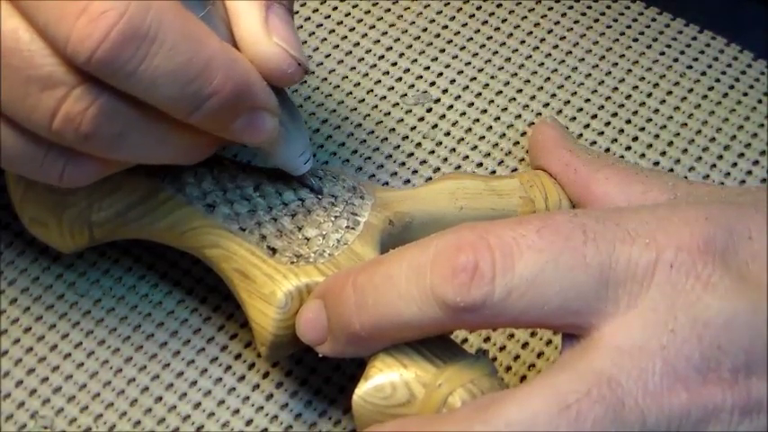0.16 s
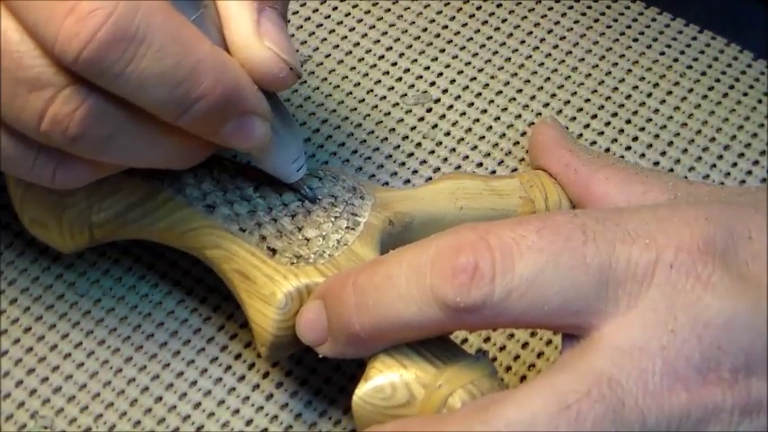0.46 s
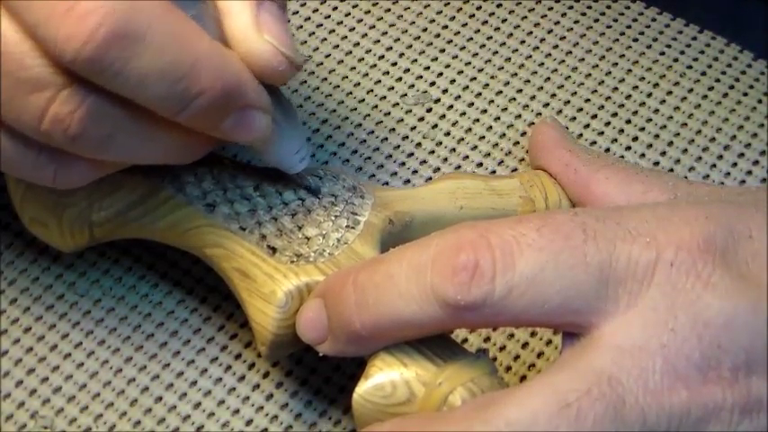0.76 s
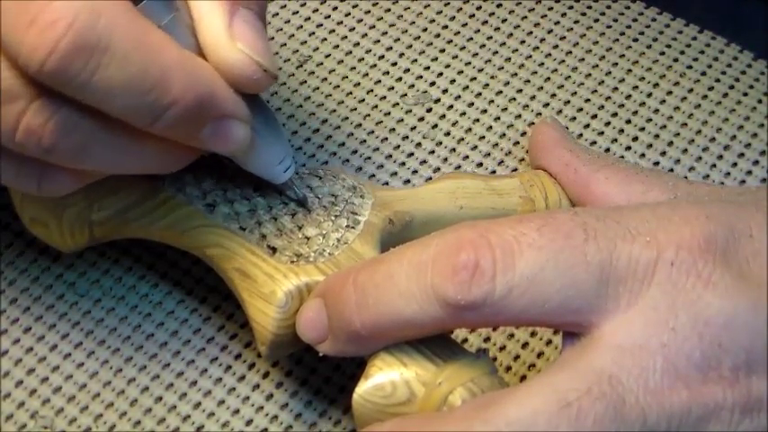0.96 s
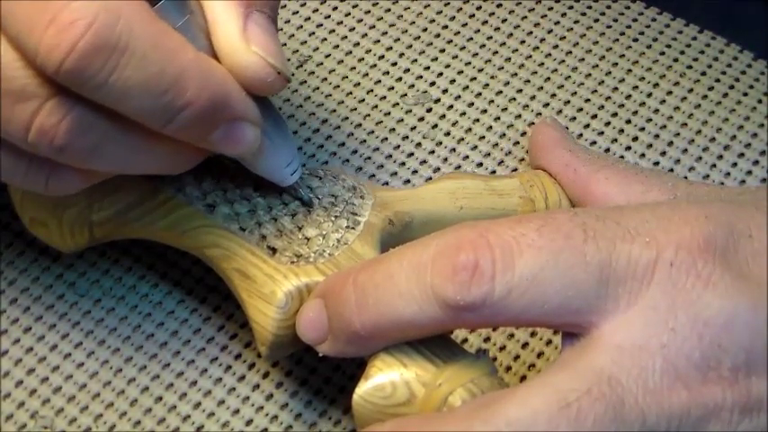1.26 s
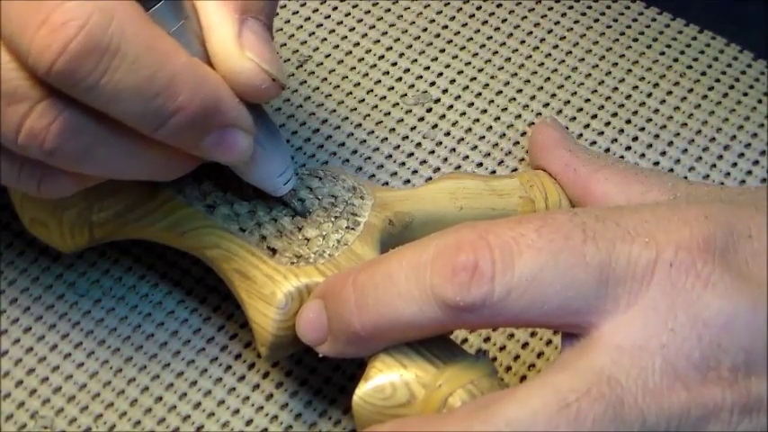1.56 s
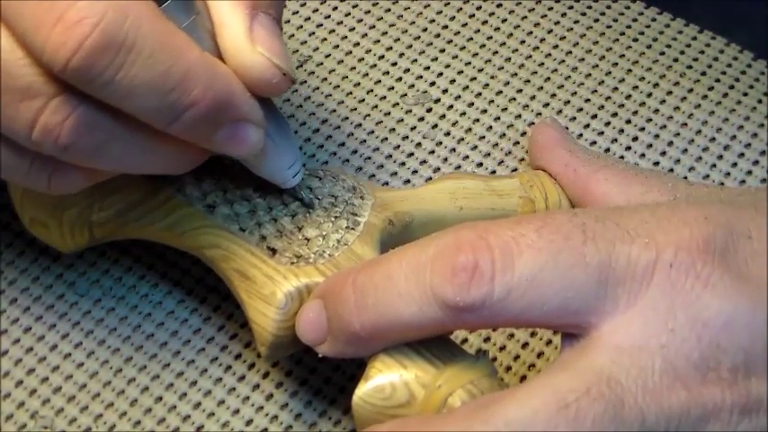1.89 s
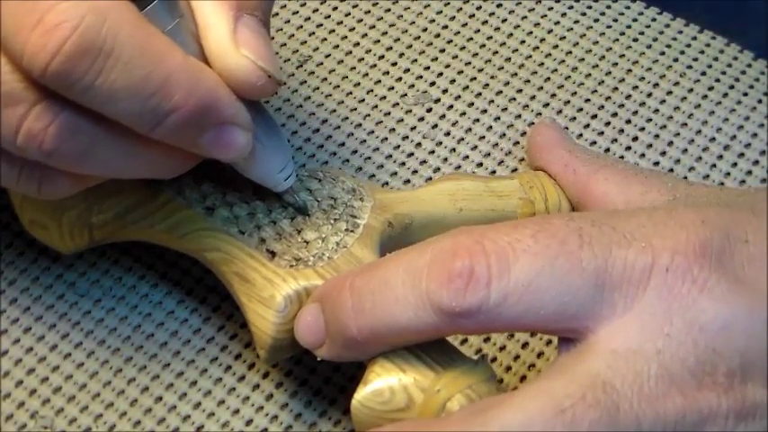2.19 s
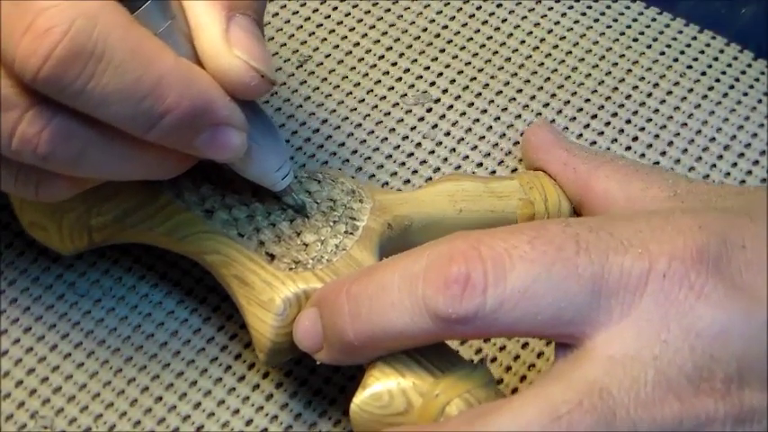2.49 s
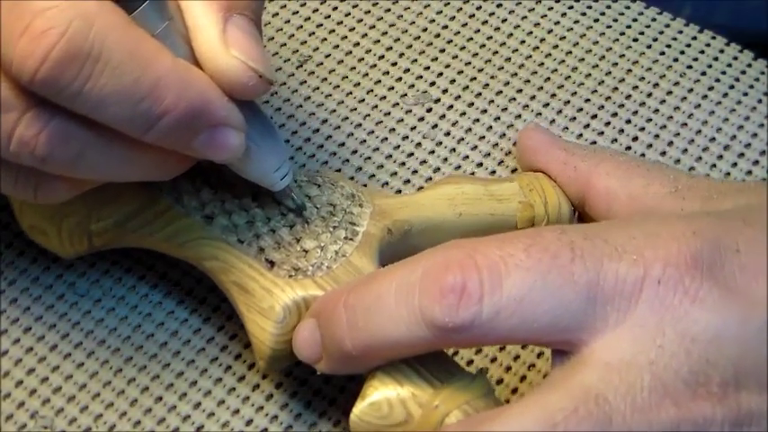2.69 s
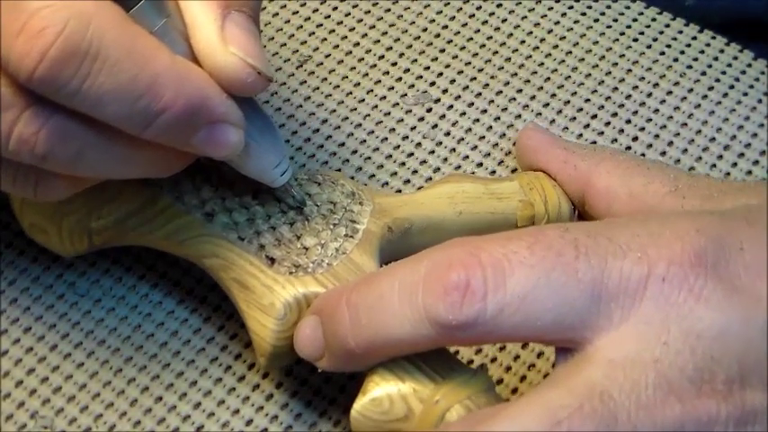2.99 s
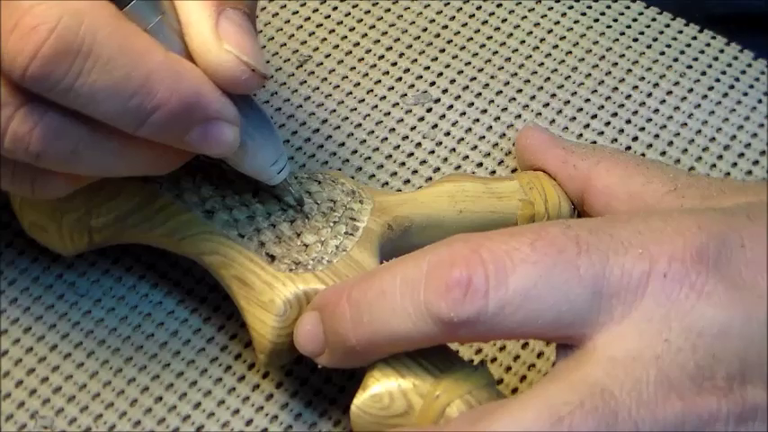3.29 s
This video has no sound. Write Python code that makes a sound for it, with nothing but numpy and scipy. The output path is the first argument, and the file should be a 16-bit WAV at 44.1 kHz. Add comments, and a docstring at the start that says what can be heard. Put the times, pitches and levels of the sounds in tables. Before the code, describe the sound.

A handheld rotary carver whines high and thin on wood throughout, sagging and flaring, with steady exhaust hiss and low buzzing compressor throb; close stereo microphone in a small workshop.

```python
"""A thin, close whine sags and flares as an air-driven rotary carver works wood, over a compressor's throb.
The turbine is a wandering sine plus its octave, and the compressor a stack of harmonics with clattering valves.
Exhaust air is filtered noise, wide in the treble; a faint whistle fades early and grows again near the end.
Short noise rasps are the burr scraping wood, and low filtered noise is the rumble of the workshop."""
import sys
import numpy as np
from scipy import signal
from scipy.fft import rfft, irfft
from scipy.io import wavfile
from scipy.ndimage import uniform_filter1d, map_coordinates

SR = 44100
rng = np.random.default_rng(int(sys.argv[2]) if len(sys.argv) > 2 else 0)


def int16_out(signal):
    """Quantize to a 16-bit WAV file."""
    q = np.round(np.clip(np.atleast_2d(signal).T, -1, 1) * 32767)
    wavfile.write(sys.argv[1], SR, q.astype(np.int16))


N = 152145
T = np.arange(N) / SR  # time in s
SHAFT_HZ = 28.152  # compressor turns per second


def undb(db):
    """Decibels to gain."""
    return 10 ** (np.asarray(db) / 20)


def curve(rows):
    """Join (time, value) rows by straight lines."""
    return np.interp(T, *np.array(rows).T)


def at(rows, hz, axis=1):
    """Read a column of a table on a log-frequency axis."""
    rows = np.array(rows)
    return np.interp(np.log(hz + 1e-9), np.log(rows[:, 0]), rows[:, axis])


def colour(x, rows):
    """Filter a sound by a table of frequency and gain, then bring it to unit rms."""
    gain = undb(at(rows, np.fft.rfftfreq(N, 1 / SR)))
    y = irfft(rfft(x) * gain, N)
    return y / y.std()


def walk(rate):
    """Smooth random drift of unit spread; rate is in fresh random steps per second."""
    size = max(int(SR / rate), 1)
    steps = np.repeat(rng.standard_normal(N // size + 2), size)
    y = uniform_filter1d(uniform_filter1d(steps, size), size)[:N]
    return y / y.std()


def turn(hz):
    """Phase in radians of something that turns at this rate."""
    return 2 * np.pi * np.cumsum(hz) / SR


def pan(db):
    """Left and right gains from left minus right dB, at equal total power."""
    gains = undb(np.array([np.atleast_1d(db), -np.atleast_1d(db)]) / 2)
    return gains / np.sqrt(np.mean(gains ** 2, axis=0))


def turbine():
    """The spinning burr sounds its turn rate and the octave; reflections shift the phase between the sides."""
    # turbine speed before jitter: (time [s], turns per second [Hz])
    speed = [(0, 5787), (.13, 5790), (.23, 5721), (.37, 5753), (.44, 5738), (.51, 5668), (.56, 5670),
             (.68, 5733), (.8, 5721), (1.02, 5784), (1.5, 5807), (1.67, 5761), (1.79, 5786), (1.88, 5739),
             (1.96, 5679), (2.1, 5757), (2.3, 5805), (2.95, 5829), (3.45, 5827)]
    # whine before trim, dips and roughness: (time [s], level [dB])
    whine_level = [(0.0, -36.8), (0.04, -40.8), (0.15, -36.9), (0.23, -35.1), (0.41, -40.0), (0.46, -34.2),
                   (0.52, -38.0), (0.58, -34.9), (0.6, -40.3), (0.7, -36.9), (0.79, -40.5), (0.85, -36.0),
                   (0.92, -40.5), (1.12, -34.8), (1.32, -35.8), (1.53, -33.0), (1.57, -36.2), (1.61, -32.4),
                   (1.68, -38.4), (1.74, -33.4), (1.83, -39.7), (1.94, -34.5), (1.96, -31.9), (2.08, -39.3),
                   (2.14, -31.1), (2.16, -38.2), (2.27, -32.2), (2.39, -35.4), (2.52, -33.9), (2.7, -40.2),
                   (2.95, -34.1), (3.44, -32.9)]
    # place of the whine as the hand moves, narrowed in swirls: (time [s], left minus right [dB])
    whine_place = [(0.0, 6.0), (0.1, 23), (0.19, -19), (0.24, 11), (0.59, -1.0), (0.63, 21), (0.75, 2.5),
                   (0.82, 19), (0.9, -3.5), (0.99, 11), (1.03, 4), (1.22, 20), (1.84, 4), (1.88, -11),
                   (2.0, 10), (2.4, 14), (2.58, -1.5), (2.71, 23), (2.95, 1), (3.45, 4)]
    # octave, flaring as the burr bites, before trim and roughness: (time [s], level [dB])
    octave_level = [(0, -48), (.1, -51), (.16, -41), (.21, -30), (.25, -48), (.35, -42), (.42, -42),
                    (.48, -35), (.55, -36.5), (.61, -50), (.68, -42), (.9, -48), (1.4, -47.5), (1.62, -42),
                    (1.75, -53), (1.83, -31.5), (1.86, -55.5), (1.89, -32), (1.95, -34), (2.0, -45),
                    (2.2, -44.5), (2.7, -52), (3.0, -43.5), (3.45, -55)]
    # moments when the whine dips and falls out of phase between the sides: (time [s], length [s])
    swirls = [(.05, .02), (.145, .027), (.355, .017), (.79, .012), (.94, .03), (1.09, .05), (1.57, .015),
              (1.82, .028), (1.91, .008), (2.08, .012), (2.16, .016), (2.23, .013), (2.66, .06)]
    whine_trim_db, octave_trim_db, octave_pan_db = 2.5, 3.5, 3.5
    whine_lag_rad, octave_lead_rad, swirl_rad = 0.94, 0.77, 2.18  # right side against left
    jitter, whine_rough_db, octave_rough_db, swirl_dip_db = 0.00014, 0.83, 2.06, 2.5

    rotor = turn(curve(speed) * (1 + jitter * walk(150)))
    swirl = sum(np.exp(-((T - s) / length) ** 2) for s, length in swirls)

    whine_phase = (whine_lag_rad + swirl_rad * swirl) * np.array([[0], [-1]])
    level_db = curve(whine_level) + whine_trim_db - swirl_dip_db * swirl + whine_rough_db * walk(200)
    whine_sides = pan(curve(whine_place) * (1 - swirl / 2))
    whine = undb(level_db) * whine_sides * np.sin(rotor + whine_phase)

    octave_phase = octave_lead_rad * np.array([[0], [1]])
    octave_db = curve(octave_level) + octave_trim_db + octave_rough_db * walk(120)
    octave = undb(octave_db) * pan(octave_pan_db) * np.sin(2 * rotor + octave_phase)
    return whine + octave


def scrapes():
    """The burr scrapes the grain: short soft rasps of wood-coloured noise."""
    # each rasp: (time [s], length [s], level [dB])
    rasps = [(.87, .035, -49.5), (.99, .02, -55), (2.33, .04, -54)]
    # tone of the wood: (frequency [Hz], relative level [dB])
    wood = [(600, -9), (900, -11), (1400, 5), (1800, 6), (2250, 12), (3000, -4), (6000, -30)]
    swell = sum(undb(db) * np.exp(-((T - s) / length) ** 2) for s, length, db in rasps)
    return swell * colour(rng.standard_normal(N), wood)


def compressor():
    """Two unequal strokes a turn throb through a low resonance; the valves clatter alike on every turn."""
    # compressor tones before trim and flutter: (multiple of the shaft rate [1], level [dB])
    tones = [(1, -59), (2, -20.5), (3, -54), (4, -31.5), (5, -58), (6, -36), (7, -39.5), (8, -45.5),
             (9, -48), (10, -59.5), (11, -43), (12, -41.5), (13, -61.5), (14, -56), (15, -62.0),
             (16, -68.5), (17, -81), (18, -61.5), (19, -54.5), (20, -77.9), (21, -67), (22, -62),
             (23, -66.5), (24, -66.0), (25, -73.5), (26, -71.5), (27, -60.5), (28, -61), (29, -63.5),
             (30, -54), (31, -54.5), (32, -61.5), (33, -55.5), (34, -77.3), (35, -60), (36, -60), (37, -62),
             (38, -72), (39, -57), (40, -63.5)]
    # where they are heard: (frequency [Hz], left minus right [dB], left lead [rad])
    tone_place = [(56, -11.5, 0.59), (112, -7.6, 0.62), (172, -4, 0.69), (231, -5, 0.23), (340, -1.5, 0.64),
                  (546, -.6, 0), (840, -1.5, 0.38), (1090, -0.5, 0.57)]
    # tone of the valves: (frequency [Hz], relative level [dB])
    valve_tone = [(900, -25), (1150, -5), (1400, -1), (1800, -4), (2300, -3.5), (3500, -14.5)]
    boom_hz, boom_width_hz, odd_lag_rad = 205, 28, .8
    scatter_hz = 382  # the room scatters the phases of tones above this
    shaft_wander, flutter_db, trim_db, clatter_db = 0.000493, 0.78, -0.32, -52

    shaft = turn(SHAFT_HZ * (1 + shaft_wander * walk(4.045)))
    throb = 0
    for k, (_, db) in enumerate(tones, 1):
        hz = k * SHAFT_HZ
        boom_lag = np.arctan2(boom_width_hz * hz, boom_hz ** 2 - hz ** 2)
        lag = boom_lag + odd_lag_rad * (k % 2)  # odd multiples make the strokes unequal
        lag = lag + (hz > scatter_hz) * rng.uniform(0, 2 * np.pi)
        lead = at(tone_place, hz, axis=2) * np.array([[1], [0]])
        flutter = flutter_db * min(hz / scatter_hz, 1) * walk(11)
        sides = pan(at(tone_place, hz))
        throb = throb - undb(trim_db + db + flutter) * sides * np.cos(k * shaft - lag + lead)

    # one turn of noise, read again and again at the shaft's pace
    one_turn = rng.standard_normal(int(SR / SHAFT_HZ))
    position = shaft / (2 * np.pi) * len(one_turn)
    clatter = map_coordinates(one_turn, [position], mode="grid-wrap", order=1)
    return throb + undb(clatter_db) * colour(clatter, valve_tone)


def exhaust():
    """Spent air hisses from the handpiece, rippled by nearby surfaces and wide in the treble."""
    # tone of the air: (frequency [Hz], relative level [dB])
    air_tone = [(500, -12), (900, -6.5), (1300, -4.5), (2050, -5.5), (2450, 1.5), (2900, -1.5), (3400, 1.5),
                (3800, -0.5), (4050, 3.5), (4350, 3.5), (4650, -2.5), (4880, 4.5), (5150, -2), (6200, -0.5),
                (6800, -0.5), (7300, 0.5), (7550, -5), (8500, 0), (9200, 1.5), (9700, -1), (10400, 2.5),
                (11100, 1), (11800, 2), (12200, 6), (12800, 3.5), (13450, -2), (13900, 6), (14130, 0)]
    # air before its slow drift: (time [s], level [dB])
    air_level = [(0, -35.5), (.9, -35.5), (1.75, -35.5), (2.4, -35), (3.45, -36)]
    # air at the two sides: (frequency [Hz], likeness [0-1], left minus right [dB], right lead [rad])
    air_image = [(600, 1, 2, 0), (1200, 1, -3, 0), (2600, 1, -0.5, 0), (3830, 1, 0, 0),
                 (4400, 0.77, -3, 0.85), (5100, 0.37, -5, 1.3), (5550, 0.53, -2, 0.54), (7160, 0.1, 0, 2.4),
                 (8100, 0.3, 2, 0.67), (9500, 0.56, 0, 0.24), (10000, 0.3, 1, 1.3), (12200, 0.6, 1, 0.86),
                 (14000, .68, 2, 0.9)]
    ripple_db, ripple_hz, drift_db = 1.57, 59.98, 0.4

    hz = np.fft.rfftfreq(N, 1 / SR)
    sides = np.array([[1], [-1]])
    mid = rfft(colour(rng.standard_normal(N), air_tone))
    side = rfft(colour(rng.standard_normal(N), air_tone))

    # more side noise makes left and right less alike
    like = np.clip(at(air_image, hz), 0, .99)
    both = mid * np.sqrt((1 + like) / 2) + side * np.sqrt((1 - like) / 2) * sides
    place = pan(at(air_image, hz, axis=2)) * np.exp(-.5j * sides * at(air_image, hz, axis=3))

    # random peaks and dips along the frequency axis
    bumps = map_coordinates(rng.standard_normal(size=1024), [hz / ripple_hz], mode="mirror")
    hiss = irfft(both * place * undb(ripple_db * bumps), N)
    return hiss * undb(curve(air_level) + drift_db * walk(15))


def whistle():
    """A thin, slightly unsteady sine pulses at the compressor's nominal turn rate."""
    # whistle before its unsteadiness and pulse: (time [s], level [dB])
    whistle_level = [(0, -54), (2.05, -68), (2.35, -49.5), (2.65, -46), (3.1, -44.5), (3.45, -43)]
    whistle_hz, pitch_wander, waver_db, pulse_depth = 2381.5, 0.00029, 0.99, .22
    pulse = 1 + pulse_depth * np.sin(2 * np.pi * SHAFT_HZ * T)
    loudness = undb(curve(whistle_level) + waver_db * walk(30.1))
    tone = np.sin(turn(whistle_hz * (1 + pitch_wander * walk(38.3))))
    return loudness * pulse * tone


def rumble():
    """The workshop rumbles low: noise mostly shared by both sides, with a little of its own on each."""
    # tone of the room: (frequency [Hz], relative level [dB])
    room_tone = [(15, 0), (35, 0.5), (80, -1.5), (150, -3), (260, -7), (340, -16.5), (460, -12),
                 (650, -24.5), (1200, -31.5)]
    room_db, room_width = -43, 0.45
    shared, apart = rng.standard_normal(N), rng.standard_normal((2, N))
    return undb(room_db) * colour(shared + room_width * apart, room_tone) * pan(-0.5)


def scene():
    """Carver, wood, compressor, air and workshop sound together."""
    return turbine() + scrapes() + compressor() + exhaust() + whistle() + rumble()


def record(dry):
    """The recorder cuts the top with a steep elliptic low-pass."""
    top_hz = 14230
    low_pass = signal.ellip(16, .1, 90, top_hz, fs=SR, output="sos")  # order, ripple dB, rejection dB
    return signal.sosfilt(low_pass, dry)


dry = scene()
out = record(dry)
int16_out(out)
```